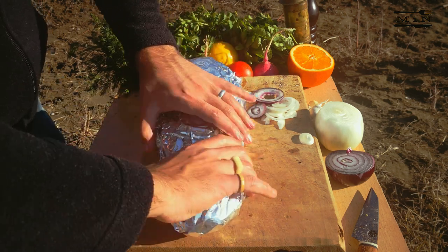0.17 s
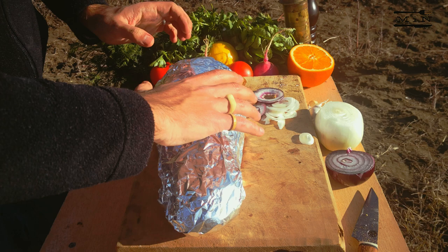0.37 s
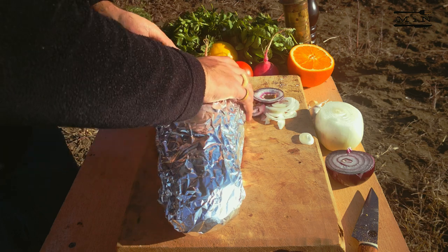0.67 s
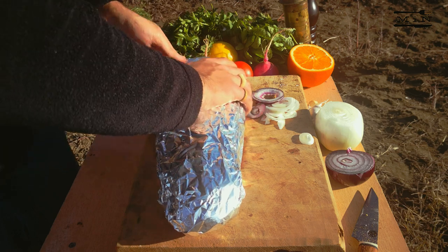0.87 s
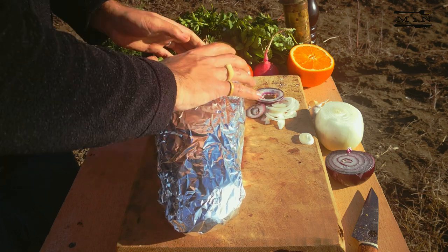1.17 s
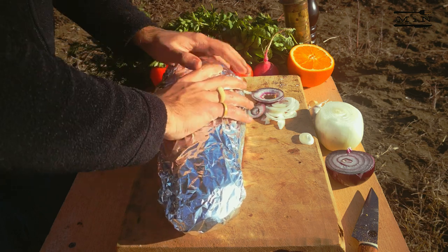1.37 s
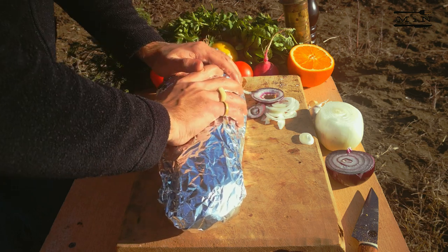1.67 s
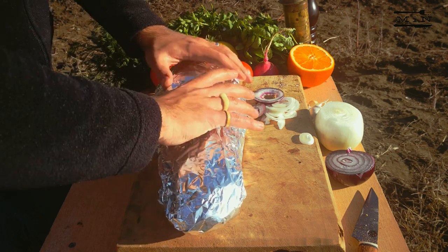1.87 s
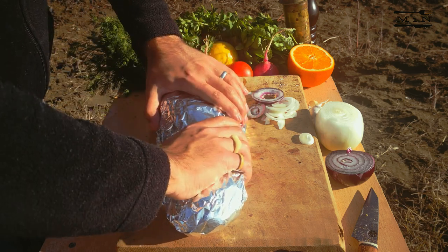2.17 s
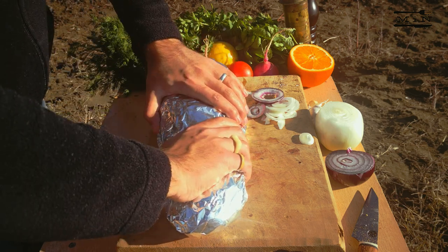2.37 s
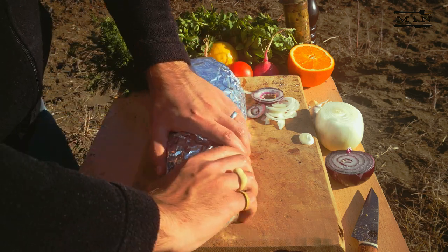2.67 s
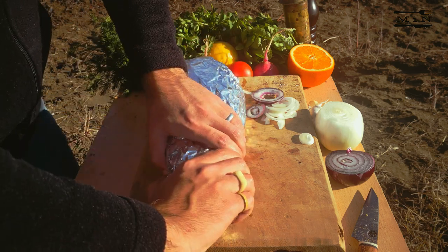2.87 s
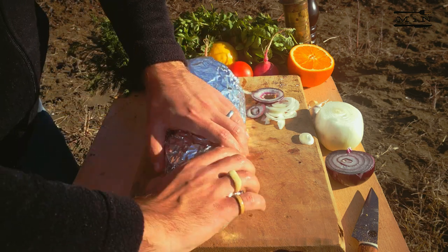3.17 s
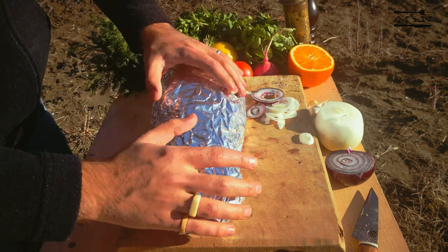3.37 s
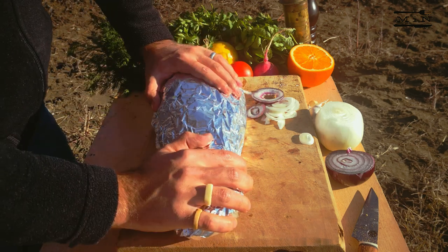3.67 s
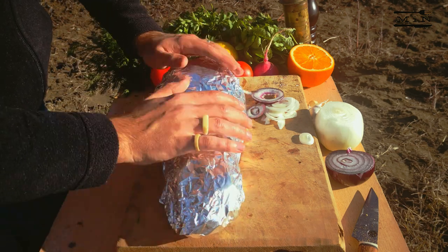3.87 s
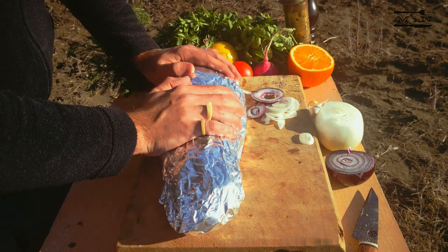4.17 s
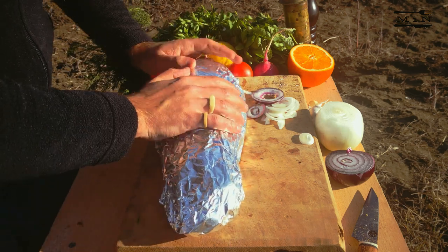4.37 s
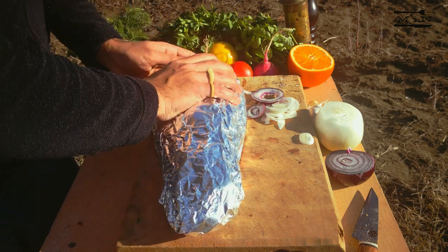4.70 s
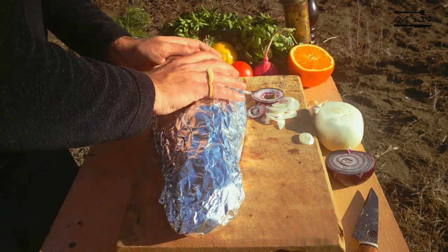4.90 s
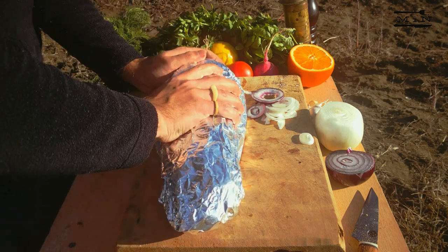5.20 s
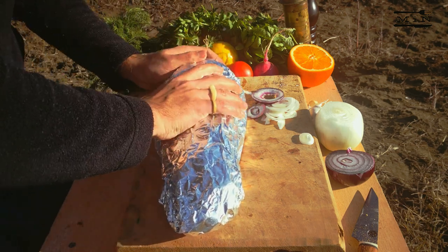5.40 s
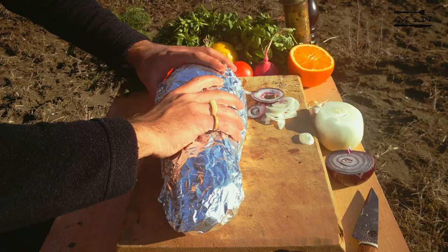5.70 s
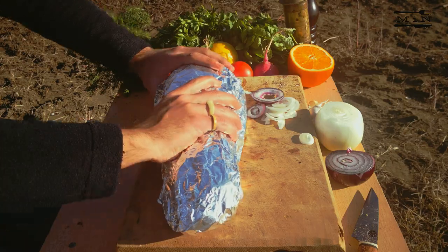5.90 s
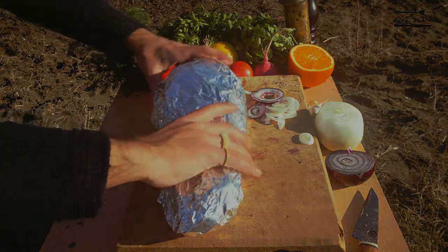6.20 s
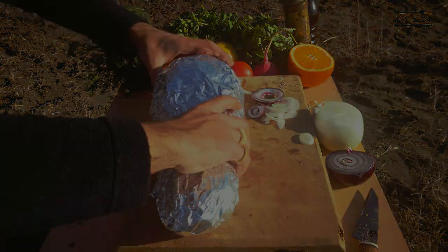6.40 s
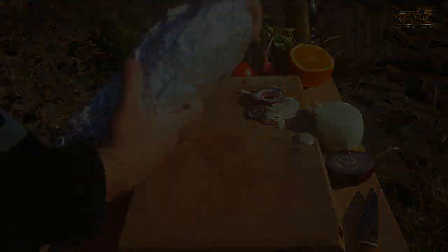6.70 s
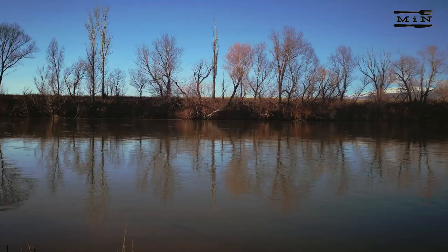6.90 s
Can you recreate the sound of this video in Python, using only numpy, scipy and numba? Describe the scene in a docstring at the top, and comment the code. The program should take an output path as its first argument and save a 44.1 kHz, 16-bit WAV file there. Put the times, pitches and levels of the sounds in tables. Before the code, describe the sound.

Close, crisp aluminium foil crackles and ticks as it is squeezed around food, with faint low bumps from a wooden board.

```python
"""Wrapping food in aluminium foil

Two hands press and smooth foil round a parcel on a wooden board, outdoors, near a stereo microphone.
Each squeeze buckles thousands of tiny facets that ring for a few cycles and set off their neighbours;
now and then a large crease snaps. Skin slides on the metal, the board rumbles and thuds under the
hands, and the sound fades out at the end."""
import sys
import numpy as np
from scipy import signal
from scipy.fft import rfft, irfft
from scipy.io import wavfile
from scipy.ndimage import uniform_filter1d
from numba import njit

SR = 44100
rng = np.random.default_rng(int(sys.argv[2]) if len(sys.argv) > 2 else 0)


def persist_wave(psi):
    """Save psi, clipped to +-1, as 16-bit WAV."""
    counts = np.round(np.clip(psi, -1, 1) * 32767).astype(np.int16)
    wavfile.write(sys.argv[1], SR, np.atleast_2d(counts).T)


N = 310905
TIME = np.arange(N) / SR

# Foil settling under still hands: level, treble share, hollow share and left minus right, all in dB.
RESTING = (-74, -3.5, -5, 6)


def crinkle(level_db, treble_db, hollow_db, pan_db, facets_per_s=2500, slide_db=-15, jerk_db=1.5):
    """Buckling noise: harder pressing flips more facets a second, over the friction hiss of skin."""
    rate = facets_per_s * undb(.5 * (level_db + 42))
    starts = TIME[rng.random(N) < rate / SR]
    size = undb(np.minimum(3.5 * rng.exponential(size=len(starts)), 12))
    modes = 3  # every facet has a low, a middle and a high mode, of uneven strength
    position = (np.arange(modes) + rng.random((len(starts), modes))).ravel() / modes
    hz = 900 * (15000 / 900) ** position
    size = np.repeat(size, modes) * (hz / 2500) ** .56 * undb(4.5 * rng.standard_normal(len(hz)))
    facets = buckle(N, np.repeat(starts, modes), hz, size, cycles=5.8, flip_cycles=1.64)
    slide = undb(slide_db) * np.sqrt(rate / rate.mean()) * rng.standard_normal((2, N))
    foil = at_microphones(palm_reflection(unit(facets) + slide))
    foil = wrinkle_tone(foil, treble_db, hollow_db)
    jerks = wander(per_s=35)  # the fingers grip and give way
    return even(foil, .039) * undb(level_db + jerk_db * jerks) * sides(pan_db - .5)


def buckle(length, starts, hz, size, cycles=3.4, flip_cycles=5.6, follow_s=.0007, scatter_db=5.5, links=6):
    """Snap-through instability: a facet flips and sets off a chain of ever weaker ringing neighbours."""
    out = np.zeros((2, length))
    for link in range(links):
        detune, damping, place, pan, flip, wait = rng.standard_normal((len(starts), 6)).T
        pitch = np.clip(hz * np.exp(.16 * np.sqrt(link) * detune), 300, SR * .4)
        base_cycles = cycles * np.exp(.4 * damping) if link else flip_cycles
        rings = np.maximum(base_cycles * np.sqrt(pitch / 2500), 1)
        lag_s = .00006 + .00005 * place  # the parcel lies nearer the left microphone
        left, right = size * np.sign(flip) * undb(-5 * link) * sides(scatter_db * pan)
        out[0] += ring(length, starts, pitch, rings, left)
        out[1] += ring(length, starts + lag_s, pitch, rings, right)
        starts = starts + follow_s * np.exp(.6 * wait)
    return out


def squeezing(release_db_per_s=450):
    """Incoherent sources add in power: gives the summed level and power-weighted treble, hollow and pan."""
    # Squeezes and strokes. Each row: full grip at and hold in seconds, mid-hold level and swell in dB,
    # attack in dB per second, then treble share, hollow share and left minus right in dB.
    squeezes = [(0.0, 0.045, -39.5, -4.5, 100.0, -3.0, -15.0, 0.5),
                (0.217, 0.148, -51.0, -10.5, 240.0, -4.0, -11.5, 1.0),
                (0.444, 0.088, -67.5, 1.5, 100.0, -5.0, -11.0, 0.0),
                (0.658, 0.021, -48.5, -1.5, 430.0, -4.0, -12.0, -1.0),
                (0.757, 0.028, -44.0, 2.0, 220.0, -5.0, -11.5, 0.5),
                (0.835, 0.16, -39.5, 1.0, 400.0, -5.0, -12.0, 0.0),
                (1.026, 0.049, -55.5, -3.0, 110.0, -4.0, -16.5, -0.5),
                (1.121, 0.065, -49.0, 5.0, 770.0, -3.5, -16.5, -1.0),
                (1.272, 0.015, -58.0, -7.5, 130.0, -3.0, -16.5, 1.5),
                (1.352, 0.043, -45.0, -2.5, 430.0, -2.5, -15.0, 1.5),
                (1.428, 0.262, -40.5, -3.5, 370.0, -3.5, -14.5, 1.5),
                (1.728, 0.019, -53.5, 2.5, 690.0, -6.5, -15.0, 1.5),
                (1.883, 0.115, -54.0, -10.5, 180.0, -2.0, -17.5, 2.0),
                (2.095, 0.254, -39.5, 2.0, 480.0, -3.5, -15.5, 2.0),
                (2.508, 0.06, -48.0, -4.0, 240.0, -3.5, -14.5, 1.0),
                (2.652, 0.225, -43.5, 7.5, 190.0, -3.0, -14.0, 1.0),
                (2.909, 0.094, -43.5, -2.0, 800.0, -4.0, -12.5, 1.5),
                (3.185, 0.045, -45.5, -0.5, 380.0, -4.0, -11.0, 0.5),
                (3.507, 0.181, -43.0, -3.0, 170.0, -3.0, -15.0, 2.5),
                (3.82, 0.088, -46.5, -1.0, 280.0, -3.5, -14.5, 2.5),
                (4.022, 0.19, -41.5, -0.5, 260.0, -3.0, -15.0, 2.5),
                (4.413, 0.074, -52.5, -10.5, 140.0, -2.5, -14.0, 1.5),
                (4.591, 0.074, -45.5, -3.0, 950.0, -3.0, -14.0, 1.5),
                (4.727, 0.032, -42.0, 2.0, 120.0, -2.5, -16.0, 1.5),
                (4.799, 0.015, -52.0, -3.0, 1000.0, -5.0, -15.5, 4.0),
                (4.924, 0.069, -48.5, 4.5, 230.0, -3.0, -15.5, 1.0),
                (5.05, 0.248, -43.5, -2.0, 530.0, -3.5, -14.5, 0.5),
                (5.454, 0.047, -47.5, 1.5, 400.0, -3.0, -15.5, 0.5),
                (5.593, 0.025, -44.5, 2.0, 360.0, -2.5, -14.5, 2.0),
                (5.68, 0.02, -47.5, -1.0, 400.0, -3.5, -15.0, 0.5),
                (5.79, 0.145, -44.0, -2.0, 100.0, -3.5, -13.5, 0.5),
                (6.057, 0.164, -53.5, -4.5, 360.0, -3.5, -11.0, 1.5),
                (6.317, 0.062, -51.0, -7.0, 170.0, -3.5, -12.5, 0.5),
                (6.443, 0.073, -48.0, 3.5, 240.0, -5.5, -9.0, -0.5),
                (6.593, 0.039, -40.5, 0.0, 200.0, -3.5, -11.0, 0.5),
                (6.748, 0.039, -66.5, 6.0, 1000.0, -4.0, -16.5, 0.5)]
    rest_db, *rest_tone = RESTING
    power = (undb(rest_db) * fade()) ** 2 + 1e-14
    tone = np.outer(rest_tone, power)
    for start, hold_s, db, swell_db, attack_db_per_s, *own_tone in squeezes:
        t = TIME - start
        held = np.interp(t, (0, hold_s), (-.5, .5))
        slack_db = attack_db_per_s * np.maximum(-t, 0) + release_db_per_s * np.maximum(t - hold_s, 0)
        own_power = undb(db + swell_db * held - np.minimum(slack_db, 120)) ** 2
        power += own_power
        tone += np.outer(own_tone, own_power)
    return 10 * np.log10(power), *(tone / power)


def wrinkle_tone(foil, treble_db, hollow_db, edges_hz=(1700, 4500)):
    """Size sets pitch: three bands share the power, from wide hollow wrinkles to tight bright ones."""
    low, body = (signal.sosfiltfilt(signal.butter(4, hz, fs=SR, output="sos"), foil) for hz in edges_hz)
    hollow, treble = undb(hollow_db), undb(treble_db)
    middle = np.sqrt(np.maximum(1 - treble ** 2 - hollow ** 2, .1))
    return hollow * even(low, .15) + middle * even(body - low, .07) + treble * even(foil - body, .048)


def palm_reflection(x, path_s=.000696, bounce_db=-11):
    """Comb filtering: a reflection off the moving palms interferes with the direct crackle."""
    delay_s = path_s * np.exp(.36 * wander(per_s=10))
    return x + undb(bounce_db) * np.array([np.interp(TIME - delay_s, TIME, channel) for channel in x])


def at_microphones(x):
    """Frequency response: the foil reaches each microphone with its own colour."""
    # Each row: frequency in Hz, left gain in dB, right gain in dB.
    foil_response = [(297, -21.5, -19.5), (652, -21.5, -18.5), (883, -5, -12.5), (1670, -7.5, -7),
                     (2180, -8.5, -1), (2780, -3.5, -4.5), (4120, -7, -6), (5730, -5.5, -7),
                     (8220, -3.5, -18.5), (9155, -13.5, -29.5), (9600, -23, -31), (11800, -29, -30),
                     (12500, -21, -29), (16000, -21, -26.5)]
    hz, *gains_db = np.transpose(foil_response)
    return np.array([colour(channel, hz, db) for channel, db in zip(x, gains_db)])


def snaps(gain_db=1, tick_db=8, tick_hz=7500):
    """Release of elastic energy: a large crease rings at its own pitch, with a tick from its edge."""
    # Each row: start in seconds, level in dB, pitch in Hz, tick trim in dB, left minus right in dB.
    creases = [(0.066, -31, 3430, -10, 8), (0.206, -39, 2260, -2, 13), (0.321, -44, 1217, -5, 7),
               (0.35, -39, 2950, -10, 7), (0.357, -36, 2970, -19, 0), (0.67, -31.5, 2330, -16, -0.5),
               (0.708, -34, 3070, -6, 7), (0.745, -34, 2180, -1, 7), (0.856, -28.5, 2110, -9, -4),
               (0.957, -24.5, 2222, -9, -1.5), (1.0, -21.5, 2660, -1, 2.5), (1.079, -41, 3500, -7, -9),
               (1.127, -34.5, 3202, 6, 7), (1.265, -39, 2541, -17, -1), (1.311, -42, 2060, -5, 1),
               (1.371, -26, 2240, 10, 3), (1.578, -26.5, 2450, -30, 2.0), (1.681, -30, 1920, -32, 11),
               (1.752, -39, 3300, -12, 12), (1.876, -38.5, 8050, -16, 8), (1.962, -31.5, 3330, -3, 2.0),
               (2.058, -46, 2080, -2.5, 10), (2.176, -25, 2795, -44, -0.5), (2.216, -22.5, 2710, -10.5, 6),
               (2.434, -39, 5690, -20, 6.5), (2.495, -35, 3120, -13, 14), (2.823, -21, 2380, -7, 8),
               (2.857, -32, 2470, -21, 8), (2.86, -28, 2100, -22, -2), (2.99, -34, 7700, -16, 8),
               (3.002, -33, 7640, -2, 5), (3.027, -40, 6370, -9, 4), (3.158, -36, 4390, -26, -12),
               (3.175, -38, 1850, -28, -5), (3.208, -43, 1410, -4, 0), (3.341, -46, 1740, -11, 7),
               (3.573, -25.5, 2350, -4, 5), (3.726, -35.5, 5326, -23, -1), (3.746, -38.5, 4330, -7, 2),
               (3.771, -47, 2230, -11, -4), (3.855, -32, 3000, -16, 4.5), (3.899, -36, 1860, -3, 5),
               (3.934, -43, 3070, -19, 2.5), (4.017, -29.5, 2230, -17, 3.0), (4.077, -33.5, 2180, -5, -4),
               (4.222, -33, 3000, -24, -1), (4.329, -40, 6090, -20, 6), (4.453, -35.5, 2130, 2, 9),
               (4.58, -45.5, 1730, -7, -3), (4.758, -28, 7880, -25, 12), (4.81, -33.5, 3000, -19, -2),
               (4.864, -46, 6160, -14, 9), (4.945, -38, 6040, -2, 11), (5.204, -28.5, 2300, -5, 1.5),
               (5.302, -27, 3130, -9, 5), (5.344, -32, 7700, -10, 5), (5.499, -33.5, 2260, 0, 11),
               (5.587, -38, 2100, -8.5, 13), (5.655, -35, 8100, -9, 8), (5.877, -23, 3200, -12, 1.0),
               (6.152, -48, 7670, -8, 7.5), (6.332, -38, 2710, -9, -3), (6.385, -36, 2920, -4, 4),
               (6.489, -31, 2040, -27, 3)]
    length = 1024
    out = np.zeros((2, N + length))
    for start, db, hz, trim_db, pan_db in creases:
        sizes = np.array([1, undb(trim_db + tick_db)])
        chain = buckle(length, np.full(2, .0008), np.array([hz, tick_hz]), sizes,
                       cycles=4.4, flip_cycles=12.7, follow_s=.00065, scatter_db=5, links=5)
        snap = at_microphones(chain)
        snap /= np.abs(snap).max(axis=1, keepdims=True)
        first = int(start * SR)
        out[:, first:first + length] += snap * undb(db + gain_db) * sides(pan_db)
    return out[:, :N]


def crack(at_s=2.9302, db=-13.2, hz=2130, width_s=.00024, shiver_db=-12):
    """Impulsive radiation: a whole fold caves in with one push of air, and the sheet round it shivers."""
    t = TIME - at_s
    push = -np.cos(2 * np.pi * hz * t) * np.exp(-.5 * (t / width_s) ** 2)
    shiver = at_microphones(buckle(N, np.full(3, at_s), np.array([1200., 2700., 7800.]), np.ones(3)))
    return undb(db) * (push + undb(shiver_db) * shiver / np.abs(shiver).max())


def ticks(crackle_db, median_gap_s=1 / 45, rest_db=-52, centre_hz=4200):
    """Elastic recovery: stray wrinkles spring back even between squeezes, louder under a firm grip."""
    size, octaves, gap = rng.standard_normal((600, 3)).T
    starts = np.cumsum(np.exp(gap)) * median_gap_s
    heard = starts < TIME[-1]
    starts, size, octaves = starts[heard], size[heard], octaves[heard]
    grip_db = np.interp(starts, TIME, crackle_db) - RESTING[0]
    db = rest_db + 1.5 * size + .34 * grip_db
    hz = np.clip(centre_hz * 2 ** (.77 * octaves), 900, 9000)
    wrinkles = buckle(N, starts, hz, undb(db), cycles=6.6, flip_cycles=6.3, follow_s=.00043, links=4)
    return at_microphones(wrinkles) * fade()


def board(crackle_db, thud_db=-7.5):
    """Modal vibration: the palms push the parcel against the board, which thuds over its rumble."""
    # Each row: time of a push in seconds, level in dB.
    pushes = [(0.038, -48), (0.799, -53.5), (1.178, -57), (1.411, -49.5), (1.521, -48), (1.669, -51.5),
              (1.899, -51.5), (2.317, -49.5), (2.89, -61), (3.679, -47), (3.908, -53), (4.217, -46.5),
              (4.619, -50), (4.88, -49), (5.197, -40.5), (5.253, -43), (5.867, -46), (5.897, -44.5),
              (5.944, -51), (6.2, -59)]
    # The board on its table. Each row: mode frequency in Hz, gain in dB, 60 dB decay time in seconds.
    modes = [(67.4, 11, 0.065), (99, -1, 0.038), (137, -30.5, 0.039), (230, -22.5, 0.06)]
    starts, push_db = np.transpose(pushes)
    thuds = np.zeros(N)
    for mode_hz, mode_db, t60 in modes:
        hz = np.full(len(starts), mode_hz, float)
        thuds += ring(N, starts, hz, hz * t60, undb(push_db + mode_db + thud_db))
    return rumble(crackle_db, pushes) + thuds


def rumble(crackle_db, pushes, rest_db=-64.5, grip_db=-22, lean_db=-9, lean_s=.047, lift_s=6.34):
    """Forced vibration: the board's low noise grows with the grip and deepens round each push."""
    # Each row: frequency in Hz, relative spectral density in dB.
    spectrum = [(12, -23), (20, -1.5), (48, -0.5), (77, -2), (129, -6.5), (220, -12.5), (359, -21),
                (600, -36), (780, -66.5), (1320, -120)]
    hz, db = np.transpose(spectrum)
    width_db = 20 * np.log10(np.clip(hz / 420, .13, 1))  # long waves reach both sides nearly alike
    mid = colour(rng.standard_normal(N), hz, db)
    side = colour(rng.standard_normal(N), hz, db + width_db)
    stereo = np.array([mid + side, mid - side]) / mid.std()
    gripping = np.hypot(undb(rest_db), undb(crackle_db + grip_db))
    lifted = undb(-31 * np.maximum(TIME - lift_s, 0))  # the parcel is picked up
    lowpass = signal.butter(2, 210, fs=SR, output="sos")
    deep = signal.sosfilt(lowpass, colour(rng.standard_normal(N), hz, db))
    swells = [undb(level + lean_db) * np.exp(-.5 * ((TIME - s) / lean_s) ** 2) for s, level in pushes]
    leaning = np.linalg.norm(swells, axis=0)
    return stereo * gripping * lifted * fade() + unit(deep) * leaning


def air(level_db=-73):
    """Ambient noise: still outdoor air gives a faint hiss, uncorrelated between left and right."""
    # Each row: frequency in Hz, relative spectral density in dB.
    spectrum = [(200, -11.5), (600, -8.5), (2200, -9.5), (5000, -11.5), (8000, -26), (10000, -23.5),
                (15500, -22.5)]
    hiss = np.array([colour(rng.standard_normal(N), *np.transpose(spectrum)) for _ in range(2)])
    return unit(hiss) * undb(level_db) * fade()


@njit
def ring(length, start, hz, cycles, size):
    """Free decay: a sum of damped sines, each 60 dB down after its number of cycles."""
    out = np.zeros(length)
    for k in range(len(start)):
        first = int(start[k] * SR) + 1
        pole = (2j * np.pi - np.log(1000) / cycles[k]) * hz[k] / SR
        phasor = size[k] * np.exp(pole * (first - start[k] * SR))
        step = np.exp(pole)
        for i in range(max(first, 0), min(length, first + int(cycles[k] * SR / hz[k]))):
            out[i] += phasor.imag
            phasor *= step
    return out


def colour(x, hz, db):
    """Minimum-phase filter through (Hz, dB) points, made by folding the cepstrum."""
    size = 4096
    bins_hz = np.maximum(np.fft.rfftfreq(size, 1 / SR), 1)
    gain = undb(np.interp(np.log(bins_hz), np.log(hz), db))
    cepstrum = irfft(np.log(gain))
    cepstrum[1:size // 2] *= 2
    cepstrum[size // 2 + 1:] = 0
    response = irfft(np.exp(rfft(cepstrum)))
    return signal.fftconvolve(x, response)[:len(x)]


def even(x, window_s):
    """Dividing by the running rms of the mid signal takes out slow swells."""
    power = uniform_filter1d(x.mean(axis=0) ** 2, max(int(window_s * SR), 1))
    return x / np.sqrt(np.maximum(power, 0) + 1e-4 * power.mean())


def wander(per_s):
    """Random values joined by straight lines."""
    knots = np.arange(0, TIME[-1] + 1, 1 / per_s)
    return np.interp(TIME, knots, rng.standard_normal(len(knots)))


def fade():
    """Gain of the closing fade-out."""
    return np.interp(TIME, (6.66, 6.965), (1, 0))


def sides(pan_db):
    """Left and right gains for a level difference."""
    return undb(np.vstack([pan_db, -pan_db]) / 2)


def undb(db):
    """Decibels to gain."""
    return 10 ** (np.asarray(db) / 20)


def unit(x):
    """Scale to rms 1."""
    return x / np.sqrt(np.mean(x ** 2))


def scene():
    """Superposition in a free field: foil, board and air add, with no walls to echo."""
    level_db, *tone = squeezing()
    foil = undb(-2.6) * crinkle(level_db, *tone) + ticks(level_db) + snaps() + crack()
    return foil + board(level_db) + air()


def record(dry, top_hz=15900):
    """Band limiting: a steep elliptic low-pass cuts the highest treble."""
    return signal.sosfilt(signal.ellip(10, .2, 70, top_hz, fs=SR, output="sos"), dry)


dry = scene()
out = record(dry)
persist_wave(out)
```